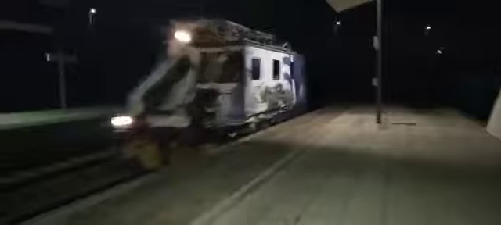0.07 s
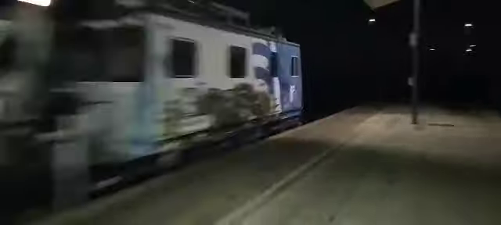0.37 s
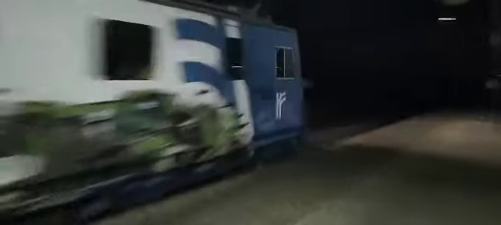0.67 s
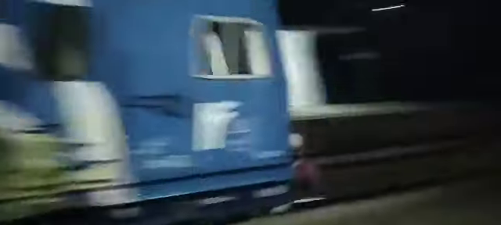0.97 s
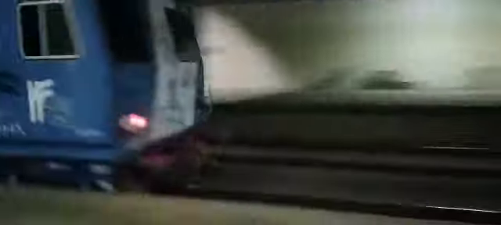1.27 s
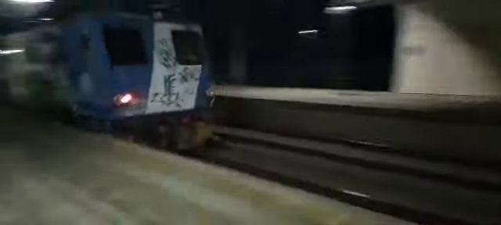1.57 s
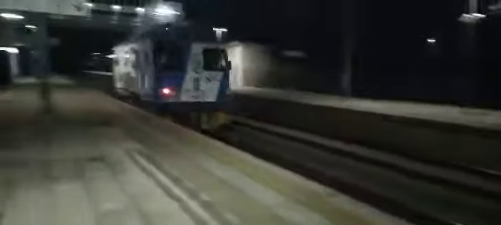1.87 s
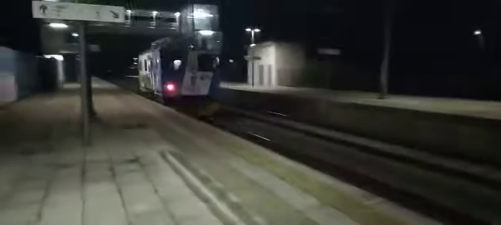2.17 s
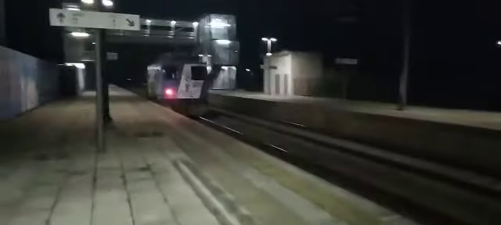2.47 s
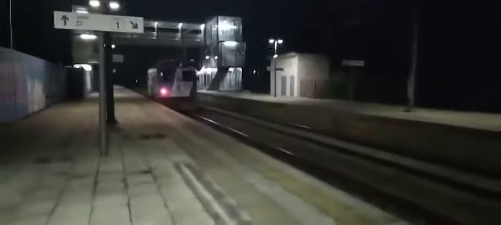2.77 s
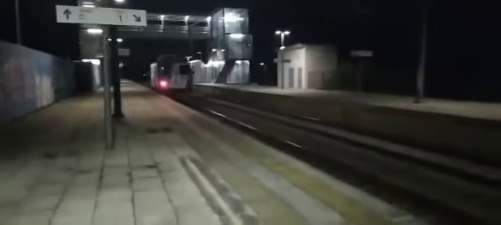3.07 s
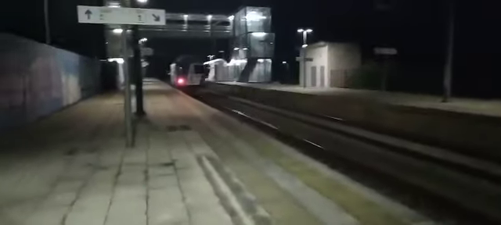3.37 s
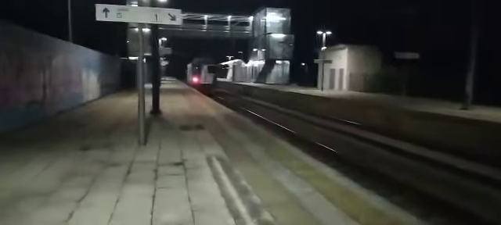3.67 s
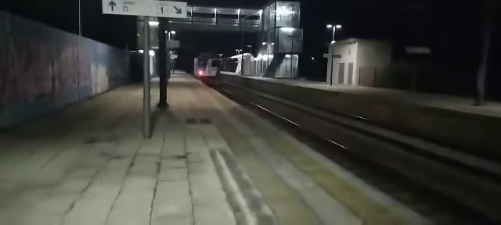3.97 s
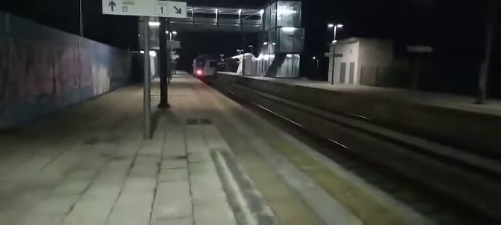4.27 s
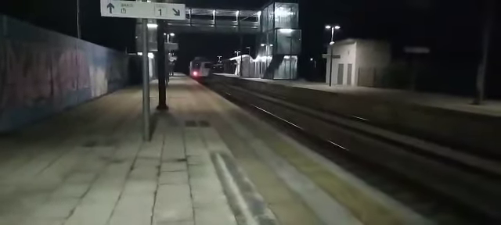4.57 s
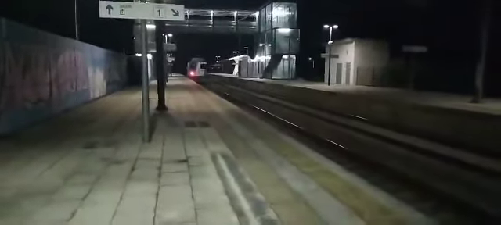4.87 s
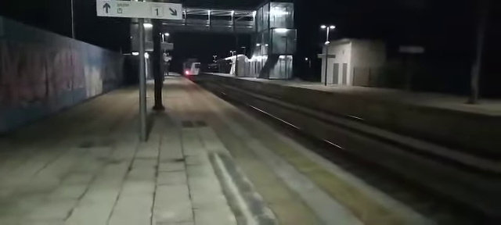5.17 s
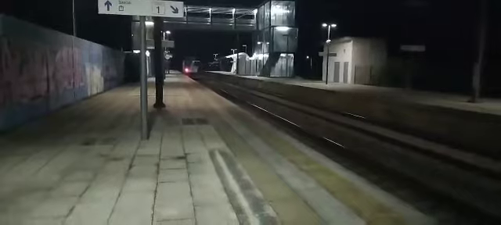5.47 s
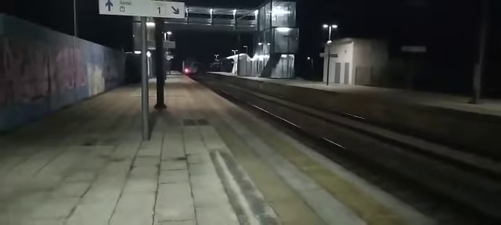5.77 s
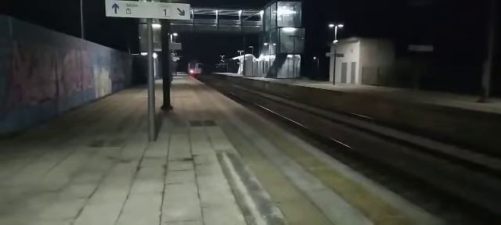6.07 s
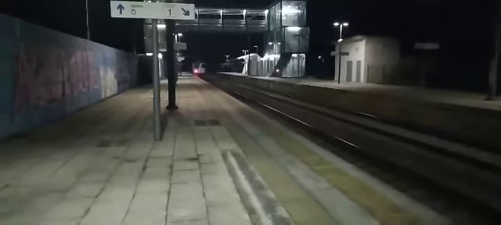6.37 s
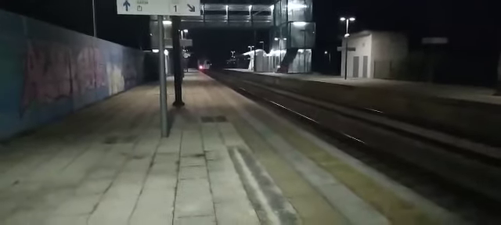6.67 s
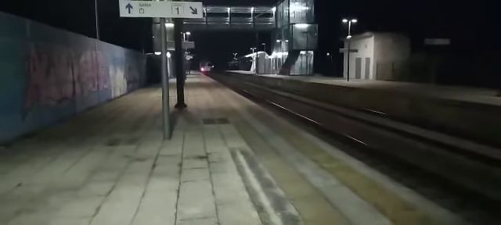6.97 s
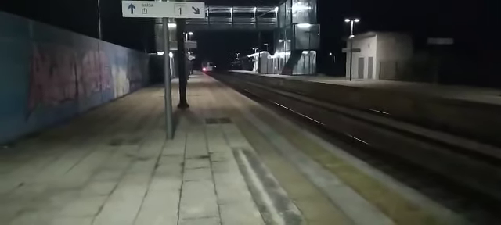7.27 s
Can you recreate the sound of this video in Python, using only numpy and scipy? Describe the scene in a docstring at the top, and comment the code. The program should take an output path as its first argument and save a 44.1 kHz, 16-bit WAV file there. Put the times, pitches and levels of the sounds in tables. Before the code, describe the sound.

A short horn blast, then a diesel rail car rushes past with rumbling, thumping wheels and fades into the distance.

```python
"""A short horn blast opens the scene, then a diesel rail car rushes past a night platform and rolls away.
Its engine drones, and rough steel wheels rumble, roar and hiss on the rails. A flat spot on one wheel
thumps once a turn, rail joints clunk, wheel rims ring, rippled rail hums and loose steel rattles.
The horn and the closest moment are loud enough to overload the microphone."""
import sys
import numpy as np
from scipy import signal
from scipy.fft import rfft, irfft, next_fast_len
from scipy.io import wavfile
from scipy.ndimage import uniform_filter1d, map_coordinates

SR = 44100
rng = np.random.default_rng(int(sys.argv[2]) if len(sys.argv) > 2 else 0)


def digitize_waveform(pressure):
    """Quantize a signal to 16-bit integers and store it at the path in sys.argv[1].

    Rows of a 2-D input are taken as channels; values are limited to [-1, 1].
    """
    field = np.atleast_2d(pressure).T
    bounded = np.clip(field, -1, 1)
    quanta = np.round(bounded * 32767).astype(np.int16)
    wavfile.write(sys.argv[1], SR, quanta)


N = 326781

# engine shaft speed as heard, dropping as the car passes (Doppler shift): t/s, f/Hz
SHAFT_SPEED = [(0, 15), (.6, 15), (.9, 13.9), (1.1, 13.6), (1.4, 13.5), (3.3, 13.58), (3.8, 14), (7.41, 13)]
# the engine's weaker notes: multiple of the shaft speed, level/dB relative to the drone
WEAK_NOTES = [(2, -15), (2.5, -24), (3.5, -37.5), (4.5, -32), (5.5, -17.5), (6, -16.5), (8, -14.5)]
# brief dips in the engine notes (negative means a swell): t/s, drone dip/dB, exhaust dip/dB
ENGINE_DIPS = [(.1, -6, -12), (.31, 2, 11), (.6, 0, 7), (.92, 5, -1.5), (1.54, -1, 18), (1.83, -0.5, -2.5),
               (2.27, 4.5, -1), (3.05, -2.5, -4), (3.66, 6, -1), (4.23, 1.5, 3), (4.62, -1, 9),
               (4.96, 5, 3), (5.33, 11, 7), (5.7, -0.5, 5), (6.95, 1, 11), (7.35, 3.5, 10)]
# whine of the cooling fan: t/s, level/dB
FAN_LEVEL = [(0, -23), (2.5, -46), (3.1, -29.5), (4.2, -37), (5.5, -38.5), (6.3, -35), (7.41, -34)]
# shakes of loose steel: t/s, level/dB
SHAKES = [(.66, -19), (1.49, -28), (1.86, -21), (2.275, -28), (2.935, -31), (4.44, -33), (4.68, -35),
          (4.99, -35), (5.12, -34), (5.395, -32), (5.53, -35), (5.94, -34.5), (6.51, -40), (6.63, -37.5),
          (6.76, -37), (7.04, -36)]
# tone colour of the loose steel: f/Hz, level/dB
STEEL_COLOUR = [(1500, -16), (3000, -4.5), (4300, 0.5), (5500, -3), (7700, -10), (9000, -27.5),
                (13000, -72)]
# rippled stretches of rail: t/s, half length/s, level/dB
RAIL_RIPPLES = [(4.627, 0.039, -14.5), (5.068, .025, -17), (6.16, 0.051, -18.5)]
# moments when the wheel rims ring: t/s, half length/s, f/Hz, level/dB
RIM_RINGS = [(.73, .08, 1800, -22.5), (1.03, .2, 2100, -22.5), (2.6, .2, 2480, -40), (2.92, .17, 2410, -36)]
# tone colour of a ringing rim: multiple of its pitch, level/dB
RIM_COLOUR = [(.7, -40), (.9, -6), (.96, -2), (1, -5), (1.04, -2.5), (1.12, -7.5), (1.5, -26), (1.68, -20),
              (1.77, -12.5), (1.86, -20), (2.2, -40), (3, -98)]
# wheels hitting rail joints: t/s, level/dB, starting f/Hz
RAIL_JOINTS = [(.555, -12, 337), (.58, -11, 298), (1.853, -8.5, 288), (2.168, -17, 502), (2.192, -11, 507),
               (2.226, -11, 373), (2.251, -19, 225), (2.279, -18, 332), (2.799, -22, 398),
               (4.548, -19, 418), (4.614, -27, 333), (5.365, -20, 442), (5.394, -18, 296), (5.43, -19, 254),
               (5.95, -26.5, 412), (5.967, -17, 272), (6.501, -18, 311), (6.524, -18, 252),
               (6.557, -25.5, 258)]
# tone colour of the clack at a joint: f/Hz, level/dB
CLACK_COLOUR = [(200, -22), (330, 12), (480, -10), (620, -7), (850, -6), (1400, -18.5), (3000, -16.5),
                (6000, -77)]
# notes of a struck wheel and track: f/Hz, level/dB, 60 dB fade time/s, loss per doubled distance/dB
TRACK_NOTES = [(135, 3, 0.059, 6.5), (183, -6, 0.12, 5), (214.2, 0.5, 0.077, 0.5), (253, -10, 0.098, 7),
               (321.8, -12.5, 0.17, 1)]
# harder knocks on uneven rail, and the flat spot's hardest blows: t/s, peak level/dB
HARD_KNOCKS = [(0.571, -6.5), (0.873, 2), (1.054, -12), (1.978, -4), (2.184, -4), (2.523, -7.5),
               (2.658, -10.5), (3.341, -9.5), (3.751, -11.5), (4.319, -17), (4.438, -10), (4.503, -10.5),
               (5.114, -10.5), (5.524, -11), (5.665, -10.5), (5.806, -15.5), (5.94, -15), (6.192, -15.5),
               (6.705, -15.5), (6.764, -12.5), (7.038, -16)]
# rolling loudness, set by distance and the state of the rail: t/s, rumble level/dB, roar level/dB
ROLLING_LEVELS = [(0, -21, -25), (.14, -22, -14), (.25, -20.5, -16.5), (.47, -15.5, -17.5),
                  (.72, -15, -13.5), (1.05, -13, -15), (1.45, -17, -18.5), (2.1, -20.5, -26),
                  (2.45, -24.5, -29), (2.88, -28, -31), (3.27, -28.5, -34), (4.05, -30.5, -34.5),
                  (4.6, -27, -33), (5.4, -29.5, -36), (5.8, -30, -38), (6.15, -30, -37.5),
                  (6.85, -34.5, -38.5), (7.41, -36, -40.5)]
# tone colours of track rumble, wheel roar and rail hiss, near and far: f/Hz, level/dB
NEAR_RUMBLE = [(47, -37), (80, -18), (100, -9), (135, -5.5), (194, -13), (233, -0.5), (274, -7.5),
               (371, -8.5), (428, -14), (600, -31.5), (780, -50), (1320, -120)]
FAR_RUMBLE = [(30, -24), (90, -7), (125, -35), (155, -7.5), (190, 3), (220, -2.5), (270, -3.5), (370, -7.5),
              (420, -9.5), (500, -15), (620, -37), (900, -75.5)]
NEAR_ROAR = [(280, -11), (480, 0), (637, 0), (831, -5.5), (968, -4), (1060, -0.5), (1220, -5.5), (1400, -2),
             (1750, -1), (2080, -1.5), (2550, -2.5), (3040, -7), (3300, -13), (4290, -26), (7260, -120)]
FAR_ROAR = [(310, -52), (520, -13.5), (612, -8), (698, 2), (754, -2), (860, 0), (936, -2.5), (1010, 3.5),
            (1150, 1), (1430, 4), (1520, 4), (1700, -5.5), (2220, 2), (2760, -4), (3300, -9.5), (4290, -15),
            (7260, -120)]
NEAR_HISS = [(2600, -14.5), (3300, 3.5), (4300, 1.5), (5500, -0.5), (6300, -4.5), (7600, -2.5),
             (8400, -9.5), (9200, -26), (12500, -32.5), (13500, -81.5)]
FAR_HISS = [(2600, -26), (3300, 0), (3700, -1.5), (4250, 3.5), (5000, -2), (6300, -7), (7700, -11.5),
            (8400, -23.5), (9200, -40), (12500, -52.5), (13500, -93)]
# how alike left and right sound, near and far: f/Hz, likeness (1 = the same)
NEAR_LIKENESS = [(60, 1), (120, 1), (250, 0.96), (500, 0.66), (1000, 0), (2000, 0.17), (8000, 0)]
FAR_LIKENESS = [(120, 1), (250, 1), (500, 0.86), (1000, 0.76), (2000, 0.25), (4000, .12), (8000, .12)]
# the horn's harmonics: multiple of its pitch, relative level/dB, echo share (0-1), opening rise/dB
HORN_HARMONICS = [(1, 0, .02, 17), (2, -6.5, .22, 0), (3, -13, .4, 9), (4, -18.5, .5, 6), (5, -18.5, .4, 3),
                  (6, -17, .25, 4), (7, -25.5, .35, 7), (8, -23, .25, 12), (9, -27, .35, 7),
                  (10, -34, .4, 4)]
# how the microphone colours the treble: f/Hz, level/dB
MIC_TREBLE = [(8500, -0.5), (12000, 3), (16000, -5)]

PASS_S, SPEED_M_PER_S, CLOSEST_M = 1, 19.4, 9.2  # the moment the car is closest, its speed and distance
HORN_HZ, HORN_SAG_HZ_PER_S, HORN_DB = 698, 30, 5.3  # the pitch sinks as the car draws level
HORN_FULL_S, HORN_OPENING_S = .065, .024  # when the note is full, and how long it takes to open
HORN_OFF_S, HORN_FADE_DB_PER_S, ECHO_FADE_DB_PER_S = .157, 250, 125  # the air is cut and the note dies
TIME = np.arange(N) / SR


def amp(db):
    """Turn decibels into a gain."""
    return 10 ** (np.asarray(db) / 20)


def unit(x):
    """Scale a signal to an average (rms) strength of 1."""
    return x / np.sqrt(np.mean(x ** 2) + 1e-20)


def along(points, hz):
    """Read between (f/Hz, value) points on a log frequency axis."""
    f, v = np.transpose(points)
    return np.interp(np.log(hz + 1), np.log(f + 1), v)


def curves(rows):
    """One value per sample for each column after the time."""
    s, *cols = np.transpose(rows)
    return [np.interp(TIME, s, c) for c in cols]


def wobble(rate, size=N):
    """A smooth random curve through rate points a second."""
    points = rng.standard_normal(int(size * rate / SR) + 4)
    return map_coordinates(points, [np.arange(size) * rate / SR])


def phase_of(hz):
    """Running phase of a changing frequency."""
    return 2 * np.pi * np.cumsum(hz) / SR


def filtered(x, response):
    """Give each frequency in x the gain response(hz)."""
    m = next_fast_len(N + SR // 4)
    return irfft(rfft(x, m) * response(np.fft.rfftfreq(m, 1 / SR)), m)[..., :N]


def add(track, s, sound):
    """Mix a sound into a track at time s."""
    start = max(round(s * SR), 0)
    part = track[start:start + len(sound)]
    part += sound[:len(part)]


def rush(colour, likeness, patchy_db, lag_s=0):
    """Stereo noise with randomly louder and softer patches; the left side hears it lag_s later."""
    spectrum = signal.stft(rng.standard_normal((2, N)), nperseg=512)[2]
    patches = uniform_filter1d(rng.standard_normal(spectrum.shape[1:]), size=4, axis=0)
    patches = uniform_filter1d(patches, size=14, axis=1)
    pair = signal.istft(spectrum * amp(patchy_db * unit(patches)), nperseg=512)[1][:, :N]
    spread = lambda hz: np.arccos(np.clip(along(likeness, hz), -1, 1)) / 2
    gains = lambda hz: amp(along(colour, hz)) * [np.cos(spread(hz)), np.sin(spread(hz))]
    mid, side = filtered(pair, gains)
    delay = lambda hz: np.exp(np.outer([-1j, 1j], np.pi * hz * lag_s))
    return unit(filtered(np.array([mid + side, mid - side]), delay))


def bursts(rows, rise, t60):
    """A loudness curve that jumps up at each (t/s, level/dB) row, then dies 60 dB in t60 seconds."""
    track, t = np.zeros(N), np.arange(SR // 2) / SR
    shape = (1 - np.exp(-t / rise)) * amp(-60 * t / t60)
    for s, db in rows:
        add(track, s, amp(db) * shape / shape.max())
    return track


def distance(s):
    """Metres from the car to the listener at time s."""
    return np.hypot(CLOSEST_M, SPEED_M_PER_S * (s - PASS_S))


def doublings(s):
    """How many times the distance has doubled compared with the closest point."""
    return np.log2(distance(s) / CLOSEST_M)


def swell(s, width):
    """A smooth hump of height 1 around time s."""
    return np.exp(-.5 * ((TIME - s) / width) ** 2)


def engine():
    """The diesel's firing drone and lower exhaust note fade with distance; its fan whines thinly."""
    shaft_hz, = curves(SHAFT_SPEED)
    fan_db, = curves(FAN_LEVEL)
    away = doublings(TIME)
    drone_dip_db, exhaust_dip_db = sum(np.outer(dips, swell(s, width=.079)) for s, *dips in ENGINE_DIPS)
    pipe_db = 4 * swell(.91, width=.17)  # louder as the exhaust pipe goes by
    drone_db = -11 - 6.5 * away - drone_dip_db + .83 * wobble(10)
    exhaust_db = -15 - 7 * away + pipe_db - exhaust_dip_db + wobble(20)
    shaft = phase_of(shaft_hz * (1 + .0022 * wobble(13)))
    note = lambda multiple: np.sqrt(2) * np.sin(multiple * shaft + rng.uniform(0, 2 * np.pi))
    weak_notes = sum(amp(db + 2.4 * wobble(2)) * note(multiple) for multiple, db in WEAK_NOTES)
    drone = amp(drone_db) * (note(multiple=5) + amp(-.5 - 1.2 * away) * weak_notes)
    exhaust = amp(exhaust_db) * note(multiple=3)
    fan_gain = amp(fan_db + 1.33 * wobble(9.9))
    fan_hz = 357 * (1 + .0089 * wobble(14))
    return drone + exhaust + fan_gain * np.sqrt(2) * np.sin(phase_of(fan_hz))


def steel_rattle():
    """Loose steel shakes on the car in short, bright bursts."""
    shakes = bursts(SHAKES, rise=.009, t60=.19)
    flicker = amp(-.5 + .96 * wobble(160))
    return shakes * flicker * rush(STEEL_COLOUR, NEAR_LIKENESS, patchy_db=-1)


def ripple_hum():
    """Rippled stretches of rail keep the wheels humming for a moment."""
    swells = sum(amp(db) * swell(s, width) for s, width, db in RAIL_RIPPLES)
    flicker = amp(.52 * wobble(46))
    hum_hz = 210.7 * (1 + .0564 * wobble(70))
    return swells * flicker * np.sin(phase_of(hum_hz))


def rim_ring():
    """Wheel rims ring as they go by and again further off: narrow bands of noise that swell and fade."""
    out = np.zeros((2, N))
    for s, width, hz, db in RIM_RINGS:
        colour = [(hz * multiple, level) for multiple, level in RIM_COLOUR]
        out += amp(db) * swell(s, width) * rush(colour, NEAR_LIKENESS, patchy_db=2.5)
    return out


def joint_clunks():
    """A wheel drops into a rail joint: a short ring that sinks in pitch, with a noisy clack."""
    rise_s, fade_s, sag_octaves_per_s = .008, .047, 12.6
    rings, t = np.zeros(N), np.arange(SR // 4) / SR
    shape = (1 - np.exp(-t / rise_s)) ** 2 * amp(-60 * t / fade_s)
    for s, db, hz in RAIL_JOINTS:
        tone = np.sin(phase_of(hz * 2 ** (-sag_octaves_per_s * t)))
        add(rings, s, amp(db) * shape / shape.max() * tone)
    hits = bursts([(s, db) for s, db, _ in RAIL_JOINTS], rise=.0027, t60=.15)
    return rings + amp(-10) * hits * rush(CLACK_COLOUR, FAR_LIKENESS, patchy_db=4)


def flat_spot_blows():
    """A flat spot hits once a turn, unless a hard knock takes its place. Gives t/s, peak level/dB."""
    anchor_s, turn_s, growth_s = 1.5717, .135827, .0000424  # one blow's time; turns lengthen as it slows
    turns = np.arange(-int(anchor_s / turn_s), int((N / SR - anchor_s) / turn_s) + 1)
    times = anchor_s + turn_s * turns + growth_s * turns ** 2 / 2
    levels = -7 - 3 * doublings(times) + 1.1 * rng.standard_normal(len(times))
    return [(s, db) for s, db in zip(times, levels)
            if all(abs(s - knock_s) > .02 for knock_s, _ in HARD_KNOCKS)]


def wheel_thumps():
    """Each blow or knock rings the low notes of wheel and track, in a slightly different mix."""
    rise_s = .006
    out, t = np.zeros(N), np.arange(SR // 4) / SR
    hz, note_db, fade_s, loss_db = np.transpose(TRACK_NOTES)[:, :, None]
    for s, db in flat_spot_blows() + list(HARD_KNOCKS):
        strength, detune = rng.standard_normal((2, len(TRACK_NOTES), 1))
        gains = amp(note_db - loss_db * doublings(s) + 1.8 * strength - 60 * t / fade_s)
        tones = np.sin(2 * np.pi * hz * (1 + .027 * detune) * (t - rise_s))
        ring = (gains * tones).sum(0) * (1 - np.exp(-t / rise_s))
        add(out, s, amp(db) * ring / np.abs(ring).max())
    return out


def passing_noise(near_colour, far_colour, halfway_m, patchy_db):
    """Noise that changes tone colour with distance: half near and half far at halfway_m metres."""
    near_share = 1 / (1 + (distance(TIME) / halfway_m) ** 1.9)
    near = rush(near_colour, NEAR_LIKENESS, patchy_db)
    far = rush(far_colour, FAR_LIKENESS, patchy_db, lag_s=.00009)
    return np.sqrt(near_share) * near + np.sqrt(1 - near_share) * far


def rolling():
    """Rough steel rolls on steel: the track rumbles, the wheels roar and the rails hiss."""
    rumble_db, roar_db = curves(ROLLING_LEVELS)
    hiss_db = -6.5 + .94 * roar_db
    judder = wobble(35)  # all three tremble together
    rumble = passing_noise(NEAR_RUMBLE, FAR_RUMBLE, halfway_m=27.7, patchy_db=1)
    roar = passing_noise(NEAR_ROAR, FAR_ROAR, halfway_m=29.8, patchy_db=1.14)
    hiss = passing_noise(NEAR_HISS, FAR_HISS, halfway_m=29.8, patchy_db=2.33)
    rumble *= amp(rumble_db + 1.6 + 1.02 * judder) * amp([[.4], [-.4]])  # left and right gain/dB
    roar *= amp(roar_db + .38 * judder) * amp([[2.1], [-.6]])
    hiss *= amp(hiss_db + .5 * judder) * amp([[2.2], [2.7]])
    return rumble + roar + hiss


def echo_flutter(size):
    """Moving reflections shake a tone's level and phase: a flutter with a faster, weaker rasp."""
    swirl = lambda rate: unit(wobble(rate, size) + 1j * wobble(rate, size))
    return unit(swirl(rate=42) + amp(-15) * swirl(rate=220))


def horn():
    """An air horn starts on its octave, opens to its full note and cuts off; echoes linger a moment."""
    size = SR // 2
    t = np.arange(size) / SR
    phase = phase_of((HORN_HZ - HORN_SAG_HZ_PER_S * t) * (1 + .0025 * wobble(120, size)))
    since_off = np.maximum(t - HORN_OFF_S, 0)
    held_back = np.interp(t, [HORN_FULL_S - HORN_OPENING_S, HORN_FULL_S], [1, 0])
    out = np.zeros((2, size))
    for multiple, db, echo_share, rise_db in HORN_HARMONICS:
        # higher harmonics are more out of step between left and right, and die sooner
        stereo_shift = np.exp(np.array([[.3j], [-.3j]]) * np.sqrt(multiple))
        dying = since_off * (1 + .35 * (multiple - 1))
        direct = np.sqrt(1 - echo_share) * stereo_shift * amp(-HORN_FADE_DB_PER_S * dying)
        shared, left, right = (echo_flutter(size) for _ in range(3))
        flutter = unit(shared + np.array([left, right]))
        echoes = np.sqrt(echo_share) * flutter * amp(-ECHO_FADE_DB_PER_S * dying)
        tone = np.imag((direct + echoes) * np.exp(1j * multiple * phase))
        out += amp(db - rise_db * held_back) * tone
    return amp(HORN_DB) * np.pad(out, ((0, 0), (0, N - size)))


def scene():
    """The horn, the engine, everything the wheels do on the rails, and the rattling steel."""
    return (horn() + engine() + rolling() + rim_ring() + wheel_thumps() + joint_clunks()
            + ripple_hum() + steel_rattle())


def record(dry):
    """A limiter turns down the loudest moments, tall peaks are squashed and the top treble is cut."""
    loudness = np.sqrt(np.abs(uniform_filter1d(dry ** 2, size=SR // 100, axis=1)))
    limited = dry / np.maximum(1, loudness)
    clipped = limited / (1 + np.abs(limited) ** 16) ** (1 / 16)
    return filtered(clipped, lambda hz: amp(along(MIC_TREBLE, hz)) * (hz < 16500))


dry = scene()
out = record(dry)
digitize_waveform(out)
```